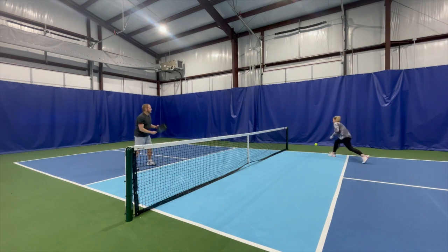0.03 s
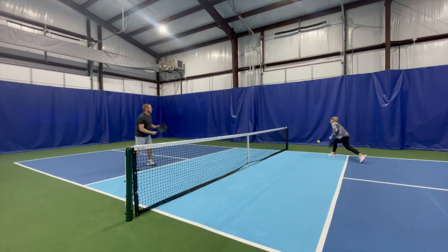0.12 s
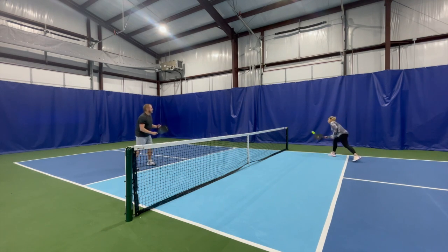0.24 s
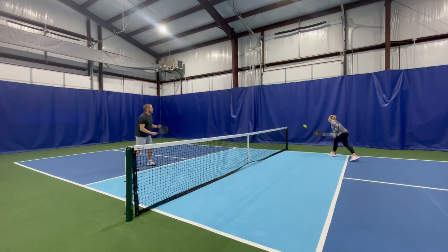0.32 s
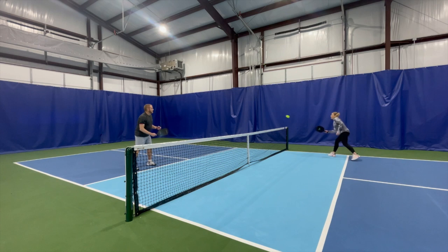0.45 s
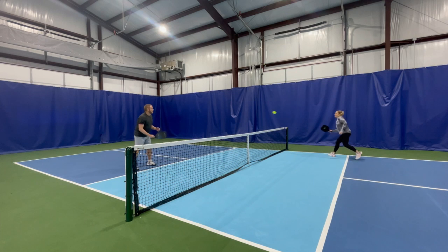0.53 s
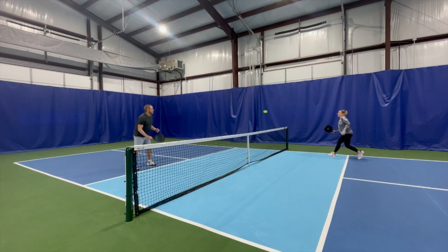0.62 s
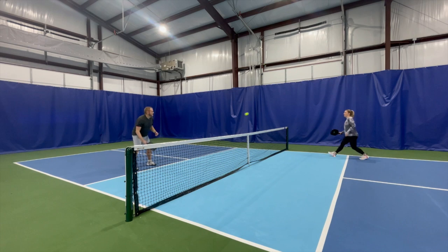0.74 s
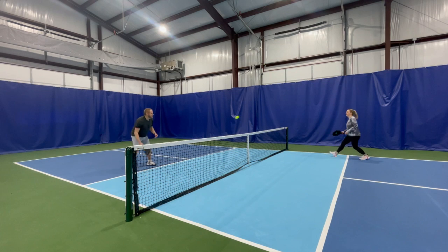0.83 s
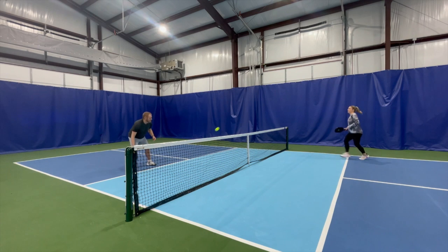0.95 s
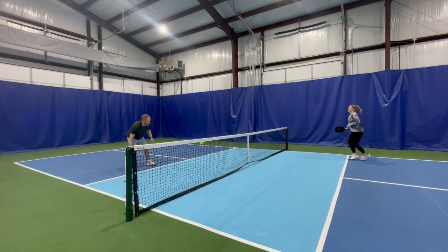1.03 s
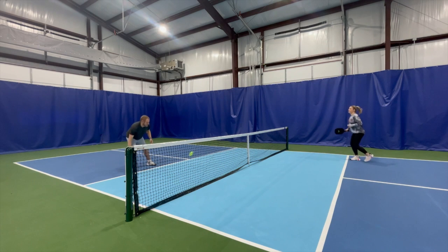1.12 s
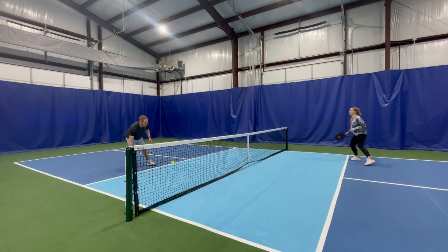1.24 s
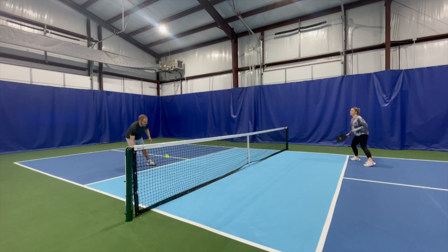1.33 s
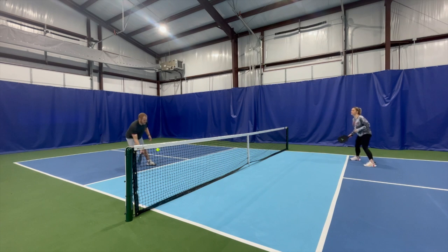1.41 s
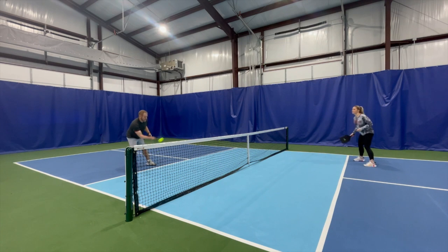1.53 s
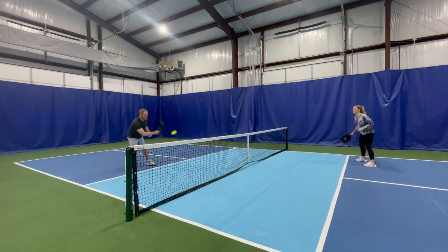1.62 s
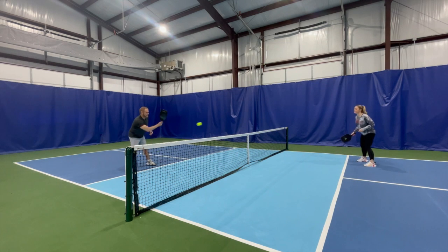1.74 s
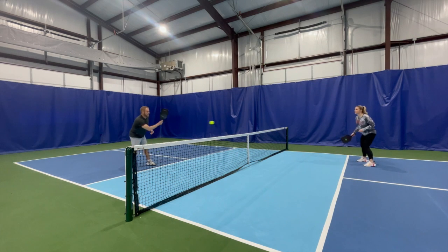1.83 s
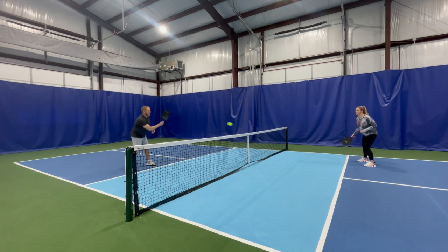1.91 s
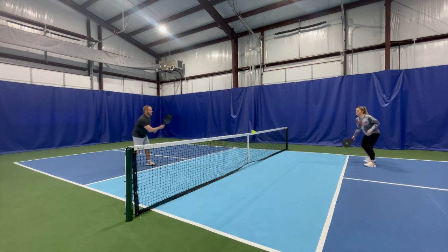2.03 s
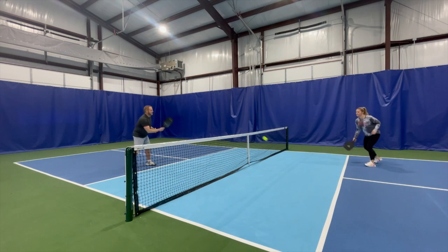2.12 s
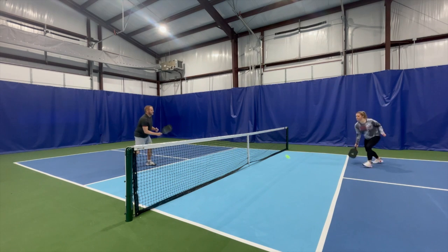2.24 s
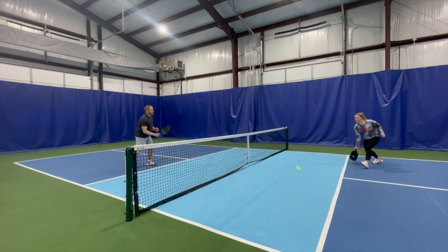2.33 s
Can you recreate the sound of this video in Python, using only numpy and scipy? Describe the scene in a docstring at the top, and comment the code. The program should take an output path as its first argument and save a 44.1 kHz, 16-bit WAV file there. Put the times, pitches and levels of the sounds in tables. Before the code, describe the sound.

Pickleball rally in a large indoor hall: two sharp paddle pops, two lighter bounces, long echo

```python
"""Pickleball rally in a large indoor hall

Heard from beside the net post: an opening bounce already dying away, then two paddle strokes and two bounces.
Each impact is a few milliseconds of noise crack, a thump falling in pitch and damped sine modes;
delayed reflections follow, then a long tail of stereo noise that fades at its own rate in each frequency.
Soft low knocks, mostly footfalls, and a shoe's scuff are shaped noise, over quiet steady ventilation noise."""
import sys
import numpy as np
from scipy import signal
from scipy.fft import rfft, irfft
from scipy.io import wavfile

SR = 44100
rng = np.random.default_rng(int(sys.argv[2]) if len(sys.argv) > 2 else 0)


def pcm_store(signal):
    """Save signal as 16-bit PCM."""
    levels = np.round(np.clip(np.atleast_2d(signal), -1, 1) * 32767)
    wavfile.write(sys.argv[1], SR, levels.astype(np.int16).T)


N = 105840  # scene length in samples
SIZE = 2048  # samples in a noise frame and in a filter
FREQS = np.arange(SIZE // 2 + 1) * SR / SIZE + 1e-3  # Hz, kept above zero for the logarithms
T = np.arange(2 * SIZE) / SR  # seconds since a contact
TAIL_S = 1.4


def amp(db):
    """Decibels to gain."""
    return 10 ** (np.asarray(db) / 20)


def curve(points, f=FREQS):
    """Read (Hz, value) points on a log-frequency axis."""
    hz, value = np.array(points, float).T
    return np.interp(np.log(f), np.log(hz), value)


def shape(x, gain):
    """Filter by a response given for every frequency."""
    impulse = irfft(gain).reshape((1,) * (x.ndim - 1) + (-1,))
    return signal.fftconvolve(x, impulse, axes=-1)[..., :x.shape[-1]]


def unit(gain):
    """Scale a filter so that it keeps the power of white noise."""
    return gain / np.sqrt(np.mean(np.abs(gain) ** 2))


def causal(db):
    """Minimum-phase filter with the given levels: nothing sounds before the blow."""
    cepstrum = irfft(np.log(amp(db)))
    cepstrum[1:SIZE // 2] *= 2
    cepstrum[SIZE // 2 + 1:] = 0
    return np.exp(rfft(cepstrum))


def hump(hz, octaves):
    """A broad resonance in dB, about 8 dB down at the given octaves from its centre."""
    return -10 * np.log10(1 + (np.log2(FREQS / hz) / octaves) ** 2) * np.e


def fade(t, t60):
    """Exponential decay that loses 60 dB in t60 seconds."""
    return np.exp(-np.log(1000) * t / t60)


def sides(db):
    """Left and right gains for a level difference."""
    return amp(np.array([[1], [-1]]) * db / 2)


def add(out, x, s):
    """Mix a sound in at time s; whatever falls outside the scene is cut."""
    i = int(round(s * SR))
    x = x[..., max(-i, 0):N - i]
    out[..., max(i, 0):max(i, 0) + x.shape[-1]] += x


def add_direct(out, x, s, pan_db):
    """A sound straight from the court reaches the right port of the microphone first."""
    port_lag_s = .00024
    left, right = sides(pan_db) * x
    add(out[0], left, s + port_lag_s)
    add(out[1], right, s)


def diffuse(db, length_s, dying=False):
    """Stereo noise from all over the hall, in overlapping frames; if dying, each frequency fades at its own rate."""
    # time to fade by 60 dB at each frequency, very short in the extreme treble: f/Hz, t60/s
    decay_times = [(60, 1.0), (150, .9), (450, .82), (1000, .78), (2000, 1.08), (4000, 1.23), (6000, 1.17),
                   (8000, .98), (12000, .72), (14000, .2)]
    # likeness of the two ports: f/Hz, left-right correlation
    likeness = [(60, .94), (180, .85), (380, .05), (700, -.4), (1300, -.3), (2100, -.35), (3000, 0),
                (8000, 0), (9400, .2), (10100, -.98), (10600, -.98), (11200, .6), (12000, .85)]
    # lean of the hall to one side: f/Hz, left-right level/dB
    balance = [(100, -.5), (380, -1), (700, -2.5), (2400, -2.6), (4400, -5.7), (8000, -2.8), (12000, 0)]
    n, hop = int(length_s * SR), SIZE // 2
    count = n // hop + 2
    mid, side = rfft(rng.standard_normal((2, count, SIZE)))
    correlation = np.clip(curve(likeness), -.99, .99)
    width = np.sqrt((1 - correlation) / (1 + correlation))
    gain = unit(amp(db)) / np.sqrt(1 + width ** 2)
    if dying:
        frame_s = np.arange(count)[:, None] * hop / SR
        gain = gain * fade(frame_s, curve(decay_times))
    spectra = np.array([mid + width * side, mid - width * side])
    spectra = spectra * gain * sides(curve(balance))[:, None]
    frames = irfft(spectra) * np.sin(np.pi * np.arange(SIZE) / SIZE)
    overlapped = frames[:, :-1, hop:] + frames[:, 1:, :hop]
    return overlapped.reshape(2, -1)[:, :n]


def ventilation():
    """Quiet, steady air noise from all round, strongest in the lows."""
    # tone of the air noise: f/Hz, level/dB
    vent_colour = [(20, -24), (60, 0), (120, -8), (250, -16), (500, -25), (1000, -26), (3000, -26),
                   (6000, -26), (12000, -35), (14000, -60)]
    level_db = -65
    return amp(level_db) * diffuse(curve(vent_colour), N / SR + 1)[:, :N]


def hall(db, swell_s, length_s):
    """Tail after one impact: grainy as it builds, smooth as it dies."""
    gap_s, grain_db, grain_fade_s = .006, 4, .09
    tail = diffuse(db, length_s, dying=True)
    t = np.arange(tail.shape[1]) / SR
    coarse_t = t[::64]
    grain = np.interp(t, coarse_t, rng.standard_normal(len(coarse_t)))
    spread = np.log(amp(grain_db)) * np.exp(-t / grain_fade_s)
    flicker = np.exp(spread * grain - spread ** 2)
    swell = 1 - np.exp(-np.maximum(t - gap_s, 0) / swell_s)
    return tail * flicker * swell


def thump(start_hz, end_hz, glide_s, peak_s):
    """A few cycles that swell and die while their pitch drops: the hollow 'pock' of a contact."""
    hz = end_hz + (start_hz - end_hz) * np.exp(-T / glide_s)
    envelope = (T / peak_s * np.exp(1 - T / peak_s)) ** 2
    return np.sin(2 * np.pi * np.cumsum(hz) / SR) * envelope


def ring(modes):
    """Damped modes after one blow, neighbours swinging in opposite directions."""
    total = np.zeros(len(T))
    for k, (hz, db, t60) in enumerate(modes):
        total += (-1) ** k * amp(db) * np.sin(2 * np.pi * hz * T) * fade(T, t60)
    return total


def crack(air):
    """The snap of hard contact: a very short noise burst, bright, with a shelf of air on top."""
    # tone of the snap: f/Hz, level/dB
    crack_colour = [(500, -25), (2500, -8), (4000, -2), (6000, 0), (9000, 0), (13000, -1), (16000, -4)]
    t60_s, rise_s = .0042, .0001
    burst = rng.standard_normal(len(T)) * fade(T, t60_s) * (1 - np.exp(-T / rise_s))
    return shape(burst, unit(causal(curve(crack_colour))) * causal(air))


def scatter(x):
    """A reflection off curtains and net: part mirror image, part smear that differs between the ports."""
    smear_t60_s, share = .02, .55  # share of the power that is smeared
    smear = rng.standard_normal((2, SIZE)) * fade(T[:SIZE], smear_t60_s)
    smear /= np.sqrt(np.sum(smear ** 2, axis=1, keepdims=True))
    smeared = signal.fftconvolve(x[None], smear, axes=-1)[:, :len(x)]
    return np.sqrt(1 - share) * x + np.sqrt(share) * smeared


def impact_bodies():
    """What sounds in each impact: its thump, its ringing modes and the colour it radiates into the hall."""
    # low thump of each contact: start f/Hz, end f/Hz, glide/s, time to peak/s
    right_floor = (1900, 500, .0015, .0008)
    right_face = (950, 180, .0023, .0024)
    left_floor = (850, 170, .0022, .002)
    left_face = (900, 260, .0035, .0034)
    # ringing modes of the ball's shell and of each paddle: f/Hz, level/dB, t60/s
    shell = [(1040, -13, .012), (1830, -2, .012), (2400, 0, .015), (2960, -4, .012)]
    right_paddle = [(930, -16, .012), (1330, -7, .011), (2060, 0, .013), (2680, -10, .01)]
    left_paddle = [(900, -2, .012), (1270, -2, .016), (1850, -3, .012), (2400, 0, .014)]
    # colour radiated into the hall by each impact: f/Hz, level/dB
    opening_bounce = [(41, -30), (100, 3), (380, -7), (550, 3), (680, -5), (950, -3), (1170, -15),
                      (1450, 1), (1780, -3), (1950, -14), (2300, -4), (2600, -14), (2850, -9), (4600, -20),
                      (9500, -13)]
    right_stroke = [(41, -49), (70, -19), (180, -2), (240, -5), (340, -5), (490, 0), (650, -6), (770, -19),
                    (900, -7), (980, -10), (1120, -1), (1350, -2), (1720, -17), (1960, -5), (2150, -7),
                    (2390, -25), (2640, -13), (3000, -27), (3300, -17), (3650, -22), (3950, -17),
                    (4300, -20), (5600, -16), (9500, -17), (20900, -17)]
    left_bounce = [(41, -43), (70, -13), (170, -2), (266, -5), (341, 1), (480, -6), (900, -7), (1040, -2),
                   (1480, -12), (1850, -4), (2080, -15), (2390, 0), (2650, -15), (2900, -3), (3400, -16),
                   (6000, -11), (9500, -10)]
    left_stroke = [(41, -52), (70, -22), (140, -12), (215, -14), (285, -2), (430, -1), (610, -1),
                   (800, -12), (1030, -23), (1250, -6), (1540, -26), (1720, -16), (1950, -16), (2200, -28),
                   (2400, -16), (2770, -26), (3020, -20), (4300, -26), (5200, -21), (9500, -23)]
    right_bounce = [(41, -30), (70, 0), (250, -9), (340, -4), (750, -11), (950, -4), (1400, -10),
                    (1800, -3), (2070, -13), (2380, -4), (2650, -14), (2950, -9), (3500, -19), (4600, -21),
                    (7000, -17), (9500, -18)]
    return {"opening bounce": (right_floor, shell, opening_bounce),
            "right stroke": (right_face, right_paddle, right_stroke),
            "left bounce": (left_floor, shell, left_bounce),
            "left stroke": (left_face, left_paddle, left_stroke),
            "right bounce": (right_floor, shell, right_bounce)}


def impacts(table):
    """The plastic ball cracks against a surface, thumps and rings; reflections and the hall answer."""
    # distinct reflections, relative to the direct sound:
    # impact, delay/s, thump level/dB, modes level/dB, crack level/dB
    echoes = [("right stroke", .0145, -12, -6, -11), ("right stroke", .0275, -18, -12, -17),
              ("right stroke", .0495, -17, -20, -25), ("right stroke", .102, -17, -19, -28),
              ("left stroke", .003, -20, -10, -13), ("left stroke", .013, -12, -11, -17),
              ("left stroke", .0368, 8, -9, -17), ("left stroke", .0605, 0, -6, -24),
              ("left bounce", .004, -12, -10, -15), ("left bounce", .0138, -5, -10, -22),
              ("left bounce", .0345, -1, -8, -16), ("right bounce", .003, -20, -8, -13),
              ("right bounce", .0155, -19, -10, -22), ("right bounce", .029, -18, -8, -9),
              ("right bounce", .0345, -18, -5, -6)]
    air_hz, flat_above_hz, hall_air_share = 9500, 9400, .45
    bodies = impact_bodies()
    out = np.zeros((2, N))
    for name, (s, low_db, upper_db, crack_db, air_db, pan_db, hall_db, swell_s) in table.items():
        contact, modes, radiated = bodies[name]
        air = air_db / (1 + (air_hz / FREQS) ** 8)  # high shelf, in dB
        low = amp(low_db) * thump(*contact)
        upper = amp(upper_db) * ring(modes)
        snap = amp(crack_db) * crack(air)
        add_direct(out, low + upper + snap, s, pan_db)
        for source, delay_s, echo_low_db, echo_upper_db, echo_crack_db in echoes:
            if source == name:
                smeared = scatter(amp(echo_upper_db) * upper + amp(echo_crack_db) * snap)
                # the long waves of the thump come back whole
                add(out, amp(echo_low_db) * low + smeared, s + delay_s)
        # the radiated colour runs level above flat_above_hz
        colour = curve(radiated, np.minimum(FREQS, flat_above_hz)) + hall_air_share * air
        add(out, amp(hall_db) * hall(colour, swell_s, TAIL_S), s)
    return out


def floor_bounces():
    """The ball's hollow shell rings as it hits the court; the opening bounce falls before the scene starts."""
    # bounces by name: t/s, thump level/dB, shell level/dB, crack level/dB, air shelf/dB,
    # left-right level/dB, hall level/dB, hall swell/s
    bounces = {"opening bounce": (-.07, -24, -32, -31, 8, 0, -37, .02),
               "left bounce": (1.1988, -34, -26, -19, 12, 2, -30, .022),
               "right bounce": (2.3283, -24, -35, -27.5, 9, -3, -38.5, .011)}
    return impacts(bounces)


def soft_knocks():
    """Soft low knocks, mostly footfalls: a falling thump with four bands of decaying noise and a hall tail."""
    # soft low knocks: footfalls, and at .634 and 1.897 likely far-wall echoes of the strokes:
    # t/s, knock level/dB, low thump level/dB, slap level/dB, tap level/dB, grit level/dB
    knocks = [(.014, -44, -38, -45, -42, -50), (.634, -53, -51, -55, -58, -72),
              (.820, -49, -47, -55, -62, -74), (1.051, -57, -50, -48, -46, -57),
              (1.126, -64, -47, -55, -57, -78), (1.897, -46, -46, -45, -62, -70),
              (2.110, -53, -52, -47, -52, -49), (2.142, -48, -44, -48, -61, -49),
              (2.320, -45, -58, -60, -66, -74)]
    # noise parts (low thump, slap, tap, grit): centre f/Hz, half-width/octaves, t60/s
    noise_parts = [(120, .7, .07), (360, .55, .035), (1150, .45, .02), (3500, 1.0, .035)]
    # pitch of the knock: start f/Hz, end f/Hz, glide/s, time to peak/s
    knock_pitch = (800, 250, .0025, .0032)
    hall_db, swell_s, pan_db = -9, .015, -2
    out = np.zeros((2, N))
    filters = [unit(causal(hump(hz, octaves))) for hz, octaves, t60 in noise_parts]
    for s, knock_db, *levels_db in knocks:
        gains = [amp(db) * part for db, part in zip(levels_db, filters)]
        knock = amp(knock_db) * thump(*knock_pitch)
        for gain, (hz, octaves, t60) in zip(gains, noise_parts):
            knock += shape(rng.standard_normal(len(T)) * fade(T, t60), gain)
        add_direct(out, knock, s, pan_db)
        power = sum(np.abs(gain) ** 2 for gain in gains)
        tail = hall(10 * np.log10(power), swell_s, TAIL_S / 2)
        add(out, amp(hall_db) * np.sqrt(power.mean()) * tail, s)
    return out


def paddle_strokes():
    """The ball is struck by each paddle in turn, and the paddle's own modes ring."""
    # strokes by name: t/s, thump level/dB, ring level/dB, crack level/dB, air shelf/dB,
    # left-right level/dB, hall level/dB, hall swell/s
    strokes = {"right stroke": (.1999, -13.5, -12, -6, 1, -2, -22, .006),
               "left stroke": (1.5005, -26, -26, -16, 8, 1, -24.5, .026)}
    return impacts(strokes)


def slide():
    """A sole hisses briefly across the court: a band of noise that swells and stops."""
    start_s, length_s, level_db = 2.274, .042, -48
    out = np.zeros((2, N))
    hiss = diffuse(hump(hz=5800, octaves=.8), .1)
    progress = np.minimum(np.arange(hiss.shape[1]) / SR / length_s, 1)
    swell = np.sqrt(np.abs(np.sin(np.pi * progress)))
    add(out, amp(level_db) * swell * hiss, start_s)
    return out


def scene():
    """Bounces, strokes, soft knocks and a sliding sole over the ventilation."""
    ball = floor_bounces() + paddle_strokes()
    return ventilation() + ball + soft_knocks() + slide()


def record(dry):
    """The microphone falls away in the top octave, then has a steep cut."""
    # response of the microphone: f/Hz, level/dB
    mic_colour = [(20, 0), (9000, 0), (10300, -1), (11300, 0), (12300, -7), (13500, -26), (15000, -20),
                  (16500, -28)]
    top_hz = 16500
    coloured = shape(dry, causal(curve(mic_colour)))
    steep_cut = signal.ellip(8, .2, 70, top_hz, fs=SR, output="sos")  # .2 dB ripple, 70 dB down
    return signal.sosfilt(steep_cut, coloured)


dry = scene()
out = record(dry)
pcm_store(out)
```